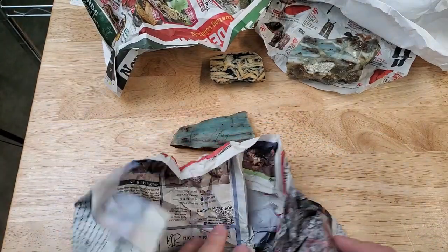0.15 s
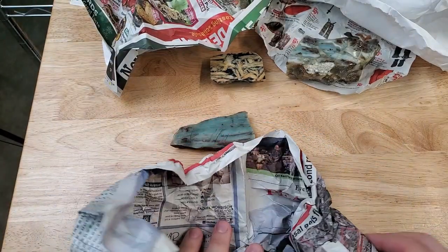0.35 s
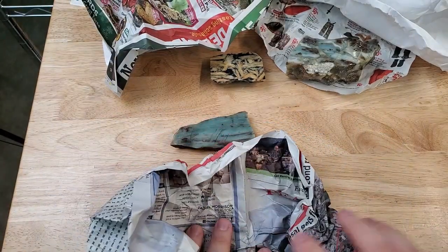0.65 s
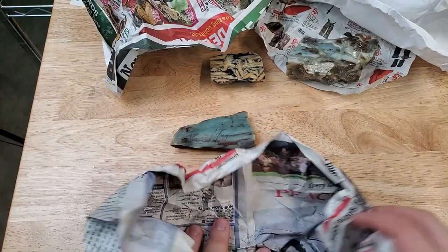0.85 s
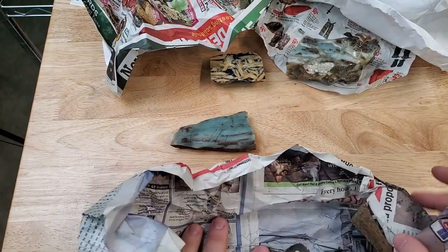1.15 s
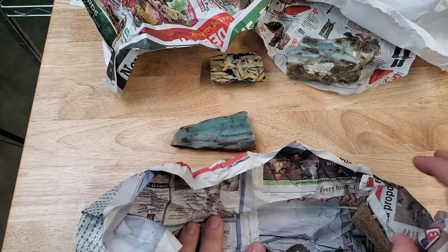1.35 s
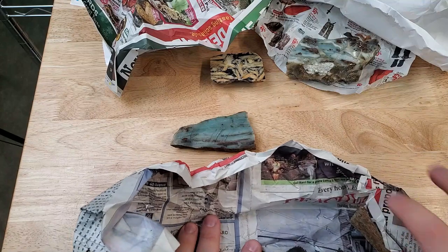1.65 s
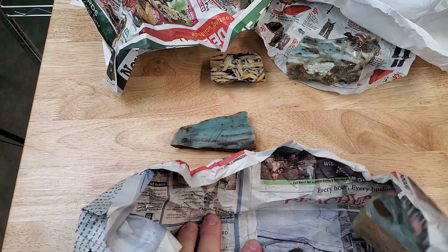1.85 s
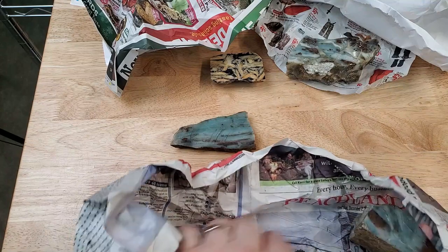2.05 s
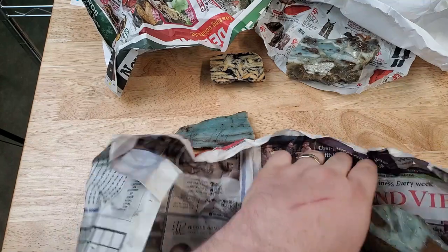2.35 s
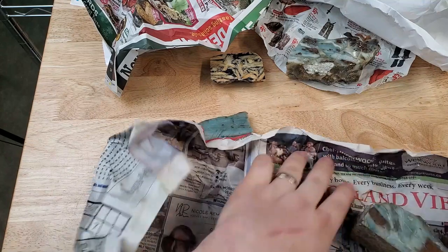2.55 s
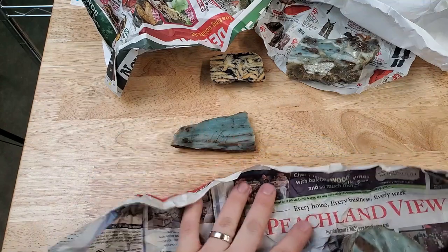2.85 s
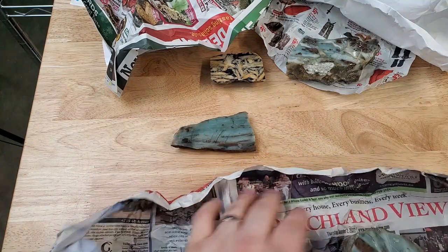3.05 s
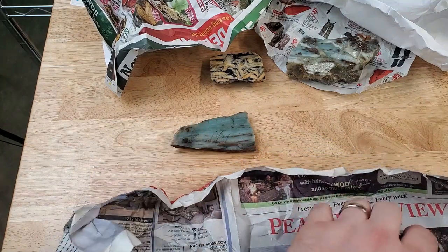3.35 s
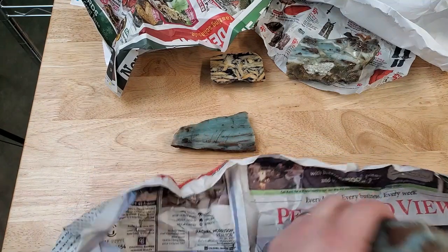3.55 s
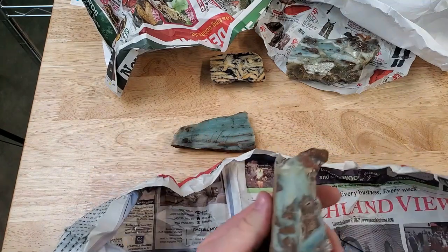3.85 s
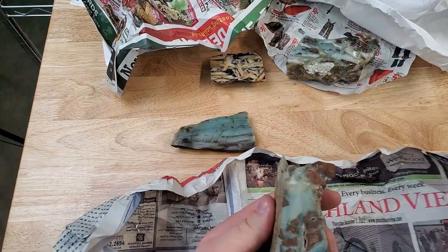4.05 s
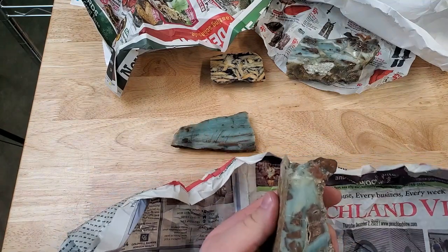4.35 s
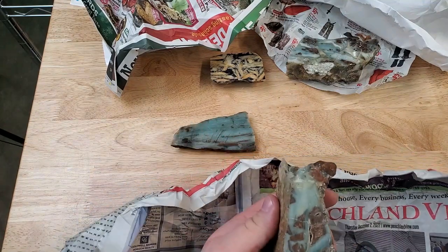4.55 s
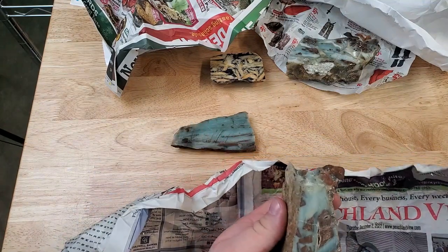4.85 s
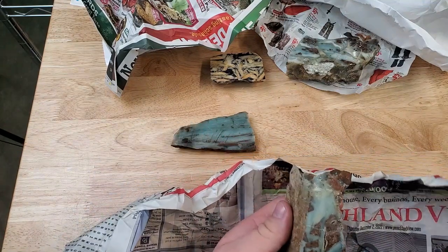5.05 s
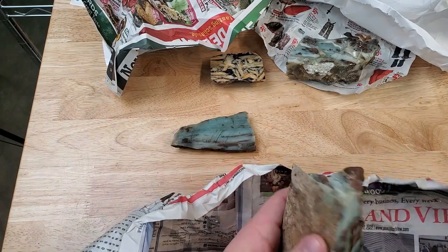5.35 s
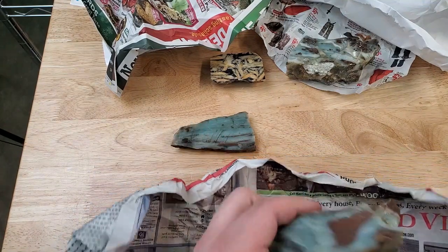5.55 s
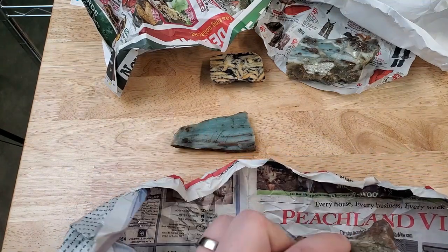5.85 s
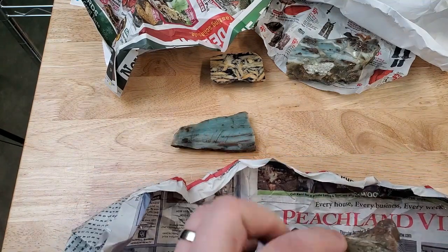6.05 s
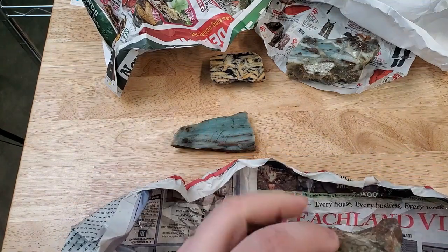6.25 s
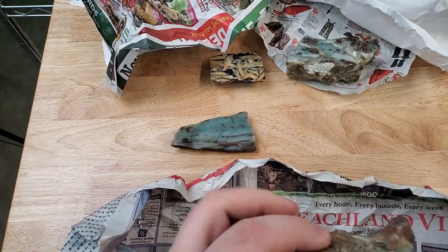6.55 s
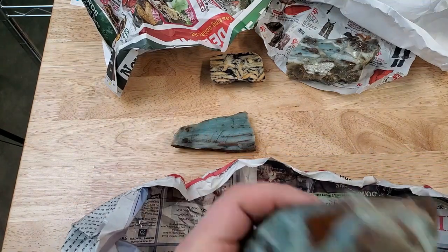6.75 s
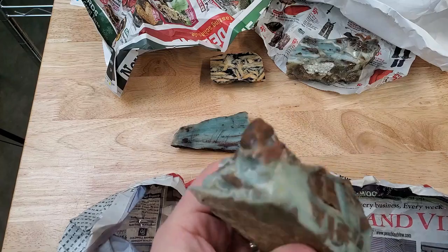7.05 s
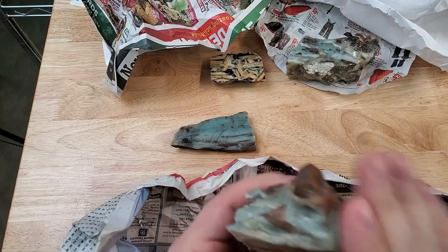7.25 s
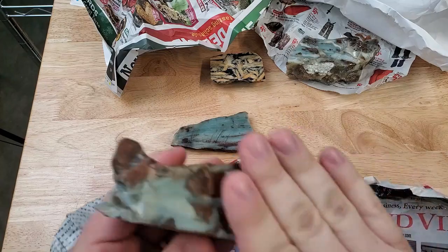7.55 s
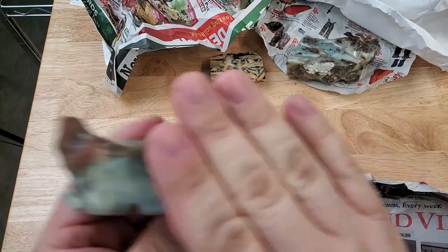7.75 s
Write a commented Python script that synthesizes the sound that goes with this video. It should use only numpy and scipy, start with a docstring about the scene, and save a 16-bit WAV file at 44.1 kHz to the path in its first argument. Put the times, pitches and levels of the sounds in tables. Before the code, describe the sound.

Close, crisp paper crumpling with a few dull table thumps, fading into dry rubbing strokes on stone and faint clacks on wood.

```python
"""Newspaper crumpled round a stone on a wooden table

Hands crumple and flatten newspaper: a crackle of tiny clicks over a smooth slide, with sharp snaps from single creases.
The wrapped stone knocks and drags on the table, a bank of ringing modes, and the sheet slips with a thin squeak.
Fingers brush grit off the stone in firm strokes and light returns of coloured grains and hiss.
Last, the bare stone is rocked on the wood: knocks, ringing clacks and crunch. Two close microphones, in a quiet room."""
import sys
import numpy as np
from scipy import signal
from scipy.io import wavfile
from scipy.ndimage import uniform_filter1d

SR = 44100
rng = np.random.default_rng(int(sys.argv[2]) if len(sys.argv) > 2 else 0)


def store_wav(level_fs):
    """Save 16-bit WAV to argv[1]."""
    pcm = np.round(np.clip(np.atleast_2d(level_fs), -1, 1) * 32767)
    wavfile.write(sys.argv[1], SR, pcm.T.astype(np.int16))


N = 348390
BARE_S = 6.8  # from here the stone is on the wood without paper

# Single creases buckling: t/s, nominal peak/dB, pitch f/Hz, treble rms over peak/dB, decay/ms
SNAPS = [(0.0506, -16, 2390, -34, 2.2), (0.1109, -10.5, 3720, -26, 1.7), (0.1335, -20.5, 2860, -31, 3.7),
         (0.143, -30, 2580, -26, 2.2), (0.18, -15, 2000, -31, 2.3), (0.209, -13.5, 2480, -36, 0.86),
         (0.2626, -16, 2970, -17, 1.2), (0.3116, -12.5, 2200, -46, 2.7), (0.282, -29, 4000, -25, 1.5),
         (0.359, -21, 5200, -30, 1.5), (0.377, -17.5, 5870, -31, 0.82), (0.418, -6.5, 1390, -25, 0.3),
         (0.505, -23, 2760, -20, 1.7), (0.54, -24, 3520, -26, 0.85), (0.5716, -23, 1730, -33, 1.4),
         (0.6324, -28, 3000, -30, 1.1), (0.7975, -19.5, 2000, -22, 2.4), (0.865, -19.5, 1780, -31, 1.5),
         (0.957, -11.5, 3180, -40, 1.1), (0.9785, -11.5, 2000, -37, 0.49), (1.0136, -13, 1960, -29, 1),
         (1.028, -13.5, 4250, -18, 2), (1.05, -16.5, 5830, -19, 2.7), (1.1132, -3, 4070, -20, 0.55),
         (1.14, -32, 4000, -18, 1.2), (1.1427, -10, 1420, -17, 1.3), (1.2087, -24, 1970, -22, 1.4),
         (1.2188, -20, 3040, -23, 1), (1.2514, -21, 1700, -23, 2.7), (1.28, -16, 3050, -21, 4.5),
         (1.2835, -8, 2180, -25, 1.2), (1.291, -19.5, 1950, -32, 5.7), (1.296, -7, 2010, -17, 0.8),
         (1.3071, -13.5, 2620, -33, 1.6), (1.364, -19, 2000, -21, 2.7), (1.369, -8.5, 5800, -15.5, 1.2),
         (1.374, -25, 1980, -16, 2), (1.381, -34, 4500, -10, 0.95), (1.392, -35, 2000, -25, 1.3),
         (1.3994, -10.5, 4200, -19, 0.53), (1.437, -23.5, 2570, -27, 1.2), (1.472, -22, 1900, -34, 1.4),
         (1.4849, -26.5, 2130, -33, 3), (1.5243, -18.5, 1460, -32, 1.4), (1.5886, -17.5, 3100, -17, 0.72),
         (1.6208, -25.5, 890, -33, 2.1), (1.6742, -15, 1470, -23, 2.7), (1.6976, -22, 1480, -22, 3),
         (1.7511, -9.5, 1110, -28, 1.26), (1.7816, -18.5, 830, -34, 1.4), (1.8645, -11, 1520, -18, 2.3),
         (1.873, -22, 2450, -21, 2), (1.8842, -36, 7000, -29, 1.2), (1.9075, -42, 3280, -13, 1.4),
         (2.1926, -30, 1450, -36, 2.2), (2.216, -33, 4000, -16, 1.1), (2.227, -27.5, 1400, -15, 1),
         (2.249, -32, 1220, -25, 1.2), (2.275, -36, 3830, -25, 1.8), (2.293, -21.5, 3580, -16, 1.4),
         (2.3262, -23, 3370, -41, 3.4), (2.37, -19, 2230, -50, 1.9), (2.471, -22.5, 3730, -13, 1.3),
         (2.48, -19, 3800, -13, 0.88), (2.5289, -15.5, 4450, -17, 2.4), (2.546, -40, 4000, -16, 1),
         (2.6652, -9.5, 2930, -27, 0.5), (2.712, -12, 1420, -21, 1.46), (2.7682, -7, 4940, -17.5, 1.35),
         (2.793, -24, 2150, -11, 1.3), (2.823, -16, 2600, -29, 1.3), (2.829, -20, 3600, -25, 1.5),
         (2.8724, -13.5, 5600, -30, 2.3), (2.878, -17, 3900, -13, 1.2), (2.921, -12, 3440, -17, 0.56),
         (3.0115, -23.5, 5430, -16.5, 2.9), (3.0735, -23, 1800, -32, 1), (3.088, -17, 3960, -17, 1),
         (3.103, -28, 4500, -11, 1), (3.1187, -22, 3520, -11, 1.8), (3.216, -36.5, 3670, -26, 4.9),
         (3.267, -25.5, 4230, -15, 3.2), (3.276, -34, 4000, -20, 1), (3.295, -31, 4190, -25, 2.1),
         (3.3387, -32, 3600, -6, 1.5), (3.3945, -18.5, 4150, -16.5, 1.3), (3.4723, -18, 3500, -28, 1.8),
         (3.519, -22, 3520, -23, 1.6), (3.5268, -9.5, 3900, -25, 1.2), (3.5543, -48, 3700, -25, 1.2),
         (3.7244, -26.5, 2800, -19, 3), (3.8114, -24, 3700, -32, 0.56), (3.8735, -24.5, 6800, -23, 1.5),
         (3.9753, -26.5, 2000, -33, 2.5), (4.0976, -30.5, 4060, -28, 2.4), (4.122, -29, 3030, -25, 1.1),
         (4.1683, -31, 3280, -36, 1.8), (4.1946, -28, 1180, -26, 1.2), (4.231, -31, 3630, -19, 1.2),
         (4.261, -35, 1200, -35, 2.4), (4.2918, -32.5, 2730, -35, 2.3), (4.3672, -29.5, 1980, -39, 3),
         (4.419, -26, 1090, -30, 0.61), (4.7188, -15.5, 4760, -17.5, 1.16), (4.8734, -39.5, 2100, -24, 1.8),
         (5.654, -36, 3440, -26, 1.1), (5.682, -39, 1210, -32, 0.99), (5.689, -44, 1230, -28, 2.9),
         (6.5228, -42.5, 4860, -28, 3.7), (6.567, -46.5, 1490, -29, 2.6), (6.594, -64, 1500, -25, 1.8),
         (6.63, -57, 3500, -24, 2), (6.647, -49, 1300, -30, 2.8), (6.684, -44.5, 5450, -22, 1.5),
         (6.7, -51, 4500, -22, 2.3)]
# Blows on the table: t/s, relative strength/dB, deep modes over upper/dB, middle modes over upper/dB,
# contact/ms, relative stone clack over strength/dB
KNOCKS = [(0.419, -15, -17, -5, 1.1, -40), (0.428, -25, -25, 0.5, 3.5, -26),
          (0.796, -30.5, -23, -32, 0.68, -31), (0.872, -32, -10, -1, 3., -35),
          (0.921, -20, -8, -1.5, 2.6, -16), (0.937, -29, -11, 6, 6.9, -34), (1.12, -15.5, 7, 1.5, 2.3, -32),
          (1.747, -45.5, -23, 0.5, 3.6, -32), (1.859, -22, -12, -6.5, 0.53, -20),
          (2.067, -42, -14, 4, 2.8, -37), (2.088, -41.5, -18, 1.5, 3.6, -27),
          (2.606, -38.5, -12, -13, 1.2, -30), (2.873, -35, -10, -1.5, 1.8, -30),
          (2.91, -49, -13, 12, 4.1, -30), (3.522, -35.5, -31, -7.5, 2.2, -37),
          (6.834, -28, 12, -26, 2.1, 2), (6.842, -36, 5, -8, 1.8, -4), (6.864, -30.5, -4, -21, 1.4, 2.5),
          (6.886, -37.5, 4, -22, 3.1, 5.5), (6.907, -42, 10, 10, 4.5, -8), (7.007, -35, 4, -9, 0.81, -6),
          (7.027, -40, -8, 9, 0.79, -16), (7.051, -39, -1, -15, 2.2, -10), (7.069, -51, 3, -12, 1.8, 2),
          (7.182, -41, 23, 5.5, 1.5, -6.5), (7.315, -39.5, -8, 1, 1.1, -10.5),
          (7.344, -49, 10, 5, 0.84, -23), (7.473, -43, 15, -9, 0.77, -11), (7.49, -60, 5, -8, 2.1, -18),
          (7.506, -47.5, 5, -12, 0.76, -16), (7.531, -51, 2, -4, 0.99, -14), (7.599, -49, 7, -8, 1.3, -6),
          (7.624, -62, 29, -8, 3.4, -20), (7.716, -47, 28, -23, 0.95, -26),
          (7.822, -44.5, 27, -18, 1, -14.5)]


def rustle():
    """Countless small creases click while the sheets slide; each snap leaves a short trail of crackle."""
    # How hard the paper is worked: t/s, crackle level/dB before the fullness below
    effort = [(0, -41.5), (.08, -33.5), (.3, -37.5), (.47, -46), (.77, -43), (.83, -33), (.89, -39),
              (1.01, -32.5), (1.13, -38), (1.25, -47.5), (1.39, -38), (1.44, -52), (1.65, -43.5),
              (1.82, -39.5), (1.88, -32.5), (2.0, -40), (2.08, -53.5), (2.2, -59.5), (2.225, -49),
              (2.26, -46.5), (2.33, -41), (2.6, -41.5), (2.85, -32), (3.04, -41), (3.12, -49),
              (3.16, -60.5), (3.44, -56.5), (3.54, -41.5), (3.6, -49), (3.71, -44), (3.8, -59),
              (3.89, -50.5), (3.98, -53), (4.06, -62), (4.3, -64), (4.4, -51.5), (4.49, -55), (4.57, -46.5),
              (4.63, -64), (4.78, -60), (4.85, -78), (4.9, -61), (5.75, -89), (6.47, -71), (6.6, -96),
              (6.635, -82), (6.73, -87), (6.82, -64)]
    # Colour of the paper crackle: f/Hz, filter gain/dB
    paper = [(240, -16.5), (400, -11.5), (606, -10), (707, -13.5), (877, -9.5), (3780, -5.5), (6990, -15.5),
             (8150, -24.5), (15100, -26), (15800, -27)]
    # Body as other folds are worked: t/s, gain of the part under 2.5 kHz/dB
    fullness = [(0, 2.5), (.3, 5.5), (.6, 2), (1., 3.5), (1.4, 3.5), (1.8, 0.5), (2.1, 0), (2.45, 3.5),
                (2.9, -1.5), (3.3, -1), (3.6, -1.5), (3.95, 6.5), (4.3, 9.5), (4.55, -4), (6.6, -8)]
    settle_db, settle_db_per_s = -29, 420  # trail under the snap's peak, and its fall
    treble_db, treble_follows = -43.5, 1  # treble at the usual crackle level, dB per dB of crackle

    clicks = grains(per_s=700, spread_db=5.0, clump_db=3.5, clump_ms=8.6, smooth_db=6.5, ms=0.8, cycles=2.2)
    crackle = colour(patchy(clicks), paper)
    s, peak_db = np.transpose(SNAPS)[:2]
    trail = dying(s, peak_db + settle_db, settle_db_per_s)
    db = decibels(amp(level(effort)) + trail)
    balanced = tilted(crackle, 7300, db, following(db, treble_db, treble_follows))
    low, high = split(balanced, 2500)
    return amp(level(fullness)) * low + high


def snaps(rows):
    """A sudden release: a burst of a few milliseconds, ringing its surroundings for a cycle or two."""
    rise_ms, ring_cycles = 0.35, 1.5
    broad_db = -0.5  # unpitched part, ahead of the 0.5 share of the ring
    crest_db = 13.5  # peak of a burst over its rms
    pan_db, pan_db_per_s, pan_scatter_db = 3.5, -1.48, 4  # events wander from left to right

    out, t = np.zeros((2, N + 800)), np.arange(700) / SR
    chance = rng.standard_normal((len(rows), 4, len(t)))
    for (s, db, hz, treble_db, ms), (a, b, c, d) in zip(rows, chance):
        pan = pan_db + pan_db_per_s * s + pan_scatter_db * d[1]
        burst = np.exp(-t * 1000 / max(ms, .3)) * (1 - np.exp(-t * 1000 / rise_ms))
        ring = np.sin(2 * np.pi * hz * t) * np.exp(-t * hz / ring_cycles)
        pitched = split(np.convolve(a * burst, ring)[:len(t)], 600)[1]
        pitched *= np.linalg.norm(burst) / np.linalg.norm(pitched)
        broad = split(split(b, 7500)[0], hz / 3 + 300)[1] * burst
        body = .5 * pitched + amp(broad_db) * broad
        body *= np.linalg.norm(burst, 4) / np.linalg.norm(body, 4)  # fourth powers favour the peaks
        treble = amp(treble_db + crest_db) * split(c, 7500)[1] * burst
        at = round(s * SR)
        lag = 5 - 2 * np.clip(pan, -4, 4)  # further left: the left side hears it sooner
        out[:, at:at + len(t)] += amp(db) * place(body + treble, pan, lag)
    return out[:, :N]


def table():
    """Blows and dragging weight drive one plate; each blow sets the share of each family of modes."""
    # Table top: f/Hz, relative level/dB, t60/s
    plate = [(74.4, -8.5, 0.25), (100.3, -6.5, 0.077), (125, -13.5, 0.083), (171, -9, 0.053),
             (215.2, 3.5, 0.19), (255.7, 3, 0.13), (307, 0.5, 0.12), (343.4, -3, 0.15), (371, 1, 0.037),
             (431.7, -10.5, 0.16), (485.4, -9, 0.14), (550, -16.5, 0.28), (632, -39, 0.1), (671, -11, 0.15),
             (722, -19.5, 0.18), (742, -14.5, 0.075), (860, -27.5, 0.34), (966, -35, 0.14),
             (1160, -21, 0.06)]
    # Ring of the stone: f/Hz, relative level/dB, t60/s
    stone = [(1550, -24, .02), (1870, -19, 0.03), (2480, -21, 0.017), (2645, -17, .03), (2725, -12, 0.04),
             (2820, -18, .03), (3050, -21, 0.019), (3380, -19, .022), (3560, -22, .02), (3880, -17, 0.018),
             (4300, -10, 0.025), (4860, -24, .015), (5550, -28, 0.02)]
    # The wrapped weight dragging over the table top: t/s, level/dB
    dragging = [(0.0, -58), (0.34, -52), (0.57, -59), (0.82, -56), (1.08, -48), (1.24, -44), (1.51, -53),
                (1.96, -52), (2.13, -59.5), (2.32, -57.5), (2.88, -46), (3.08, -51), (3.25, -55.5),
                (4.26, -61), (4.57, -68.5), (4.9, -103)]
    # The bundle comes to rest and stills the table top: t/s
    settled = [0.499, 1.178]
    stilled, still_db_per_s = 0.94, 62  # gain taken from the free 1.5, and how fast the hold eases
    deep_hz, upper_hz = 190, 300  # borders of the mode families
    chip_ms, scratch_db = 2.6, 5  # decay of the rough contact; its gain ahead of band filters
    ring_follows = 0.11  # light blows ring the stone less: extra dB per dB of clack
    drag_deep_db, press_wood_db, press_deep_db = 2, 3.5, -0.5  # drag; hand pressure through the arm
    grind_deep_db, grind_wood_db, grind_stone_db = 6, 0, -11  # deep modes, other modes, stone over the crunch
    chatter_db, chatter_db_per_s = -17.5, 247  # the wrapped stone chatters on: over the blow, and its fall
    bare_hz, bare_db = 293, 0.5  # upper wood gain once the stone is bare

    deep = [m for m in plate if m[0] < deep_hz]
    middle = [m for m in plate if deep_hz < m[0] < upper_hz]
    upper = [m for m in plate if m[0] > upper_hz]

    push, (hard, ringing) = np.zeros((3, N + 800)), np.zeros((2, N + 800))
    n = np.arange(300)
    chip_shape = np.exp(-n / SR * 1000 / chip_ms) * np.minimum(n / 40, 1)
    chips = rng.standard_normal((len(KNOCKS), 300)) * chip_shape  # every clack differs
    tap = signal.windows.hann(300) * np.exp(-n / 6) * 200
    for (s, db, deep_db, middle_db, ms, clack_db), chip in zip(KNOCKS, chips):
        blow = np.gradient(signal.windows.hann(round(ms * SR / 1000) + 2))  # pressed in, then released
        at = round(s * SR)
        push[:, at:at + len(blow)] -= amp(db - 8) * amp([[deep_db], [middle_db], [0]]) * blow
        hard[at:at + len(chip)] += amp(db - 12 + clack_db) * chip
        ring_db = following(db + clack_db, -25, 1 + ring_follows)
        ringing[at:at + len(chip)] += amp(ring_db) * (chip / 5 + tap)

    swell = amp(1.8 * evened(uniform_filter1d(rng.standard_normal(N), 900)))
    bumps = np.gradient(rng.standard_normal(N)) * swell
    press = strokes()[-1]
    load = amp(level(dragging)) + amp(press_wood_db) * press
    deep_load = amp(level(dragging) + drag_deep_db) + amp(press_deep_db) * press
    deep_load += amp(rocking() + grind_deep_db)
    drag = load * evened(modes(middle + upper, bumps)) + deep_load * evened(modes(deep, bumps))

    s, db = np.transpose([k[:2] for k in KNOCKS if k[0] < BARE_S])
    chatter = dying(s, db + chatter_db, chatter_db_per_s) * evened(modes(upper, bumps))
    hold = uniform_filter1d(np.minimum(dying(settled, 0, still_db_per_s), 1), 400)
    free = 1.5 - stilled * hold
    blows = sum(map(modes, [deep, middle, upper], push))
    rocked = amp(rocking() + grind_wood_db) * evened(modes(middle + upper, np.cumsum(bumps)))
    wood = free * (blows + chatter) + drag + rocked
    bare = wood * (np.arange(N) > BARE_S * SR)
    wood += (amp(bare_db) - 1) * split(bare, bare_hz)[1]

    scratch = split(split(hard[:N], 3200)[0], 1300)[1]
    clack = modes(stone, ringing) + amp(scratch_db) * scratch
    clack += amp(rocking() + grind_stone_db) * evened(modes(stone, bumps))
    return place(wood, -0.27, 5.3) + place(clack, -3.1, 15)


def brush():
    """Skin slides over gritty rock: dense hiss of grains, and a dull rub in the hand."""
    # Colour of the grit: f/Hz, filter gain/dB
    grit = [(290, -27), (500, -7), (800, -3.5), (1300, -4.5), (1800, 0), (2300, -3.5), (4400, 0),
            (5010, -2.5), (7370, -6.5), (8390, -8), (15300, -6.5)]
    # Hollow of the hand holding the stone: f/Hz, relative level/dB, t60/s
    palm = [(286, 16, 0.4), (387, 12, 0.034), (485, 5, 0.088), (556, -28, 0.0078)]
    # Faint high hiss while the stone is turned in the hands: t/s, level/dB
    turning = [(7.3, -93), (7.378, -60), (7.444, -60), (7.466, -80), (7.494, -64), (7.618, -51),
               (7.676, -66), (7.718, -55.5), (7.764, -53), (7.83, -77), (7.856, -55), (7.9, -46)]
    late_body_db = -12.5  # lower part of that hiss under its high part

    slide = grains(per_s=1600, spread_db=4.0, ms=0.21, cycles=0.8, smooth_db=4.0, clump_db=3.5, clump_ms=6.)
    hiss = colour(slide, grit)
    rub = place(evened(modes(palm, hiss[0])), 0.1, 9.8)
    high, body, press = strokes()
    graze = amp(level([(BARE_S, -200)] + turning))
    low_db = decibels(body + amp(late_body_db) * graze)
    return tilted(hiss, 5280, low_db, decibels(high + graze)) + press * rub


def strokes():
    """Gains of hiss, body and pressure: each stroke lands fast and fades; its pressure is one late hump."""
    # Firm strokes and light returns: start t/s, hiss level/dB, length/s, pressure on the stone/dB
    fingers = [(4.921, -32, 0.3, -50), (5.103, -52, 0.068, -56.5), (5.222, -29, 0.16, -44.5),
               (5.338, -40, 0.15, -61.5), (5.485, -54.5, 0.2, -55.5), (5.792, -33.5, 0.01, -75),
               (5.815, -24.5, .1, -67), (5.925, -45, 0.16, -63), (6.027, -26.5, 0.14, -48.5),
               (6.152, -44, 0.096, -59.5), (6.236, -29.5, 0.18, -49.5), (6.371, -45.5, 0.12, -53)]
    land_db_per_s, lift_db = 982, -49.5  # swell up to the start; fade after one length
    lift_shape = 2.15  # higher: the stroke holds, then stops more suddenly
    body_db, body_follows = -44.5, 0.47  # body at the usual hiss level, dB per dB of hiss
    press_late, press_s = 0.29, 0.041  # hump centre as a share of the length; its width

    s, db, length, press_db = np.transpose(fingers)[:, :, None]
    t = np.arange(N) / SR - s
    land_db = land_db_per_s * np.minimum(t, 0)
    sliding_db = db + lift_db * (np.maximum(t, 0) / length) ** lift_shape
    hiss = amp(land_db + sliding_db).sum(0)
    body = amp(land_db + following(sliding_db, body_db, body_follows)).sum(0)
    hump = np.exp(-((t - press_late * length) / press_s) ** 2)
    return hiss, body, (amp(press_db) * hump).sum(0)


def grind():
    """Rough rock crunches on the wood after each bare blow and while it scuffs."""
    # Colour of the crunch: f/Hz, filter gain/dB
    tone = [(180, -18.5), (300, -8.5), (772, -10.5), (1230, -18), (2390, -19), (2720, -20), (5740, 0.5),
            (15800, 14)]
    treble_db, treble_follows = -60, 0.32  # treble at the usual crunch level, dB per dB of crunch
    rough = grains(per_s=1400, spread_db=-3.5, clump_db=5.5, clump_ms=4.1, ms=2.3, cycles=1.7, smooth_db=4.)
    return tilted(colour(rough, tone), 3200, rocking(), following(rocking(), treble_db, treble_follows))


def rocking():
    """Crunch level in dB: each blow of the bare stone adds a dying burst, and scuffing sustains it."""
    # The bare stone scuffing along the wood between blows: t/s, level/dB
    scuff = [(6.8, -120), (7.01, -66), (7.035, -53), (7.08, -54), (7.13, -84), (7.46, -83), (7.51, -57),
             (7.56, -69), (7.6, -49), (7.66, -80)]
    grind_db, grind_db_per_s = -6, 217  # crunch over the blow that starts it, and its fall
    s, db = np.transpose([k[:2] for k in KNOCKS if k[0] > BARE_S])
    return decibels(dying(s, db + grind_db, grind_db_per_s) + amp(level(scuff)))


def squeak():
    """A narrow fuzzy tone follows the slip of the sheet after a thud."""
    # One list per slip: t/s, pitch f/Hz, level/dB
    slips = [
        [(2.062, 700, -73), (2.074, 1310, -45), (2.08, 2220, -42), (2.088, 2670, -66)],
        [(2.088, 1610, -52), (2.105, 1635, -47), (2.13, 1710, -53), (2.15, 1560, -63)],
    ]
    blur_hz = 120  # bandwidth of the fuzz
    out, t = np.zeros(N), np.arange(N) / SR
    for rows in slips:
        s, hz, db = np.transpose(rows)
        r = np.exp(-np.pi * blur_hz / SR)
        blur = evened(signal.lfilter([1], [1, -r], rng.standard_normal(N)))
        turn = 2 * np.pi * np.cumsum(np.interp(t, s, hz)) / SR
        gain = amp(np.interp(t, s, db, left=-200, right=-200))
        out += gain * (.4 * np.sin(turn) + blur * np.cos(turn))
    return place(out, 0, 4.3)


def room(x):
    """Dense echoes, each band dying at its own speed."""
    # Decay of the room: f/Hz, t60/s
    decay = [(200, .14), (1000, .13), (4000, .15), (12000, .11)]
    hz, t, z = signal.stft(rng.standard_normal((2, SR // 2)), SR, nperseg=128)
    tail = signal.istft(z * amp(-60 * t / read(decay, hz)[:, None]), SR, nperseg=128)[1]
    onset = np.minimum(np.arange(tail.shape[1]) / 300, 1)
    low, high = split(tail * onset, 340)
    tail = high + 0.6 * low.mean(0) + 0.4 * low  # long waves reach both microphones more alike
    return signal.oaconvolve(x, tail / np.linalg.norm(tail[0]), axes=1)[:, :N]


def air():
    """Steady hush of the room: coloured noise with its bass common to both sides."""
    # Quiet room: f/Hz, filter gain/dB
    hush = [(18, -1), (30, 16.5), (86, -4), (294, -16.5), (523, -8), (662, -18), (1340, -17), (2460, -19),
            (3740, -21.5), (7990, -33), (15800, -32)]
    noise = rng.standard_normal((3, N))
    shared, separate = split(noise[:1], 680)[0], split(noise[1:], 350)[1]
    return amp(-56.5) * evened(colour(shared + separate, hush))


def grains(per_s, spread_db, clump_db, clump_ms, ms, cycles, smooth_db, count=14, order=3):
    """Small releases in clumps, each spot with its own pitch and bearing, over a smooth slide."""
    drift = evened(uniform_filter1d(rng.standard_normal(N), round(clump_ms * SR / 1000)))
    clumps = amp(clump_db * drift)
    size = amp(spread_db * np.minimum(rng.exponential(1, N), order))  # order caps the spread
    size = size * (rng.random(N) < per_s / SR * clumps)
    spot, t, out = rng.integers(0, count, N), np.arange(400) / SR, np.zeros((2, N))
    for k, hz in enumerate(np.geomspace(800, 13000, count)):
        burst = rng.standard_normal(len(t)) * np.exp(-t * 1000 / ms)
        ring = np.sin(2 * np.pi * hz * t) * np.exp(-t * hz / cycles)
        grain = 0.43 * burst / np.linalg.norm(burst) + np.sqrt(hz / 4000) * ring / np.linalg.norm(ring)
        clicks = signal.oaconvolve(size * (spot == k), grain)[:N]
        out += place(clicks, 1.4 * rng.standard_normal(), rng.integers(-4, 14))
    slide = rng.standard_normal((2, N)) * np.sqrt(clumps)
    crossed = slide + 0.11 * np.roll(slide[::-1], 6, axis=1)  # each side leaks late into the other
    return evened(out) + amp(smooth_db) * evened(crossed)


def patchy(x):
    """Random bright and dull spots drift over time and pitch, as each fold colours the crackle."""
    patch_db, patch_hz, patch_ms = 2.5, 1200, 15
    z = signal.stft(x, nperseg=256, noverlap=192)[2]
    spots = rng.standard_normal(z.shape[:0:-1]).T
    spots = uniform_filter1d(spots, max(round(patch_hz * 256 / SR), 1), axis=0)
    spots = evened(uniform_filter1d(spots, max(round(patch_ms / 1000 * SR / 64), 1), axis=1))
    return evened(signal.istft(z * amp(patch_db * spots), nperseg=256, noverlap=192)[1][:, :N])


def modes(bank, drive):
    """Each mode rings from the drive; neighbours start in opposite directions."""
    t = np.arange(SR // 2) / SR
    ring = np.zeros(len(t))
    for k, (hz, db, t60) in enumerate(bank):
        ring += (-1) ** k * amp(db - 60 * t / t60) * np.sin(2 * np.pi * hz * t)
    return signal.oaconvolve(drive, ring)[:N]


def colour(x, points):
    """Causal minimum-phase filter with the given gain curve."""
    hz = abs(np.fft.fftfreq(4096, 1 / SR))
    log_gain = np.log(amp(np.maximum(read(points, hz), -80)))
    taps = np.fft.ifft(np.exp(np.conj(signal.hilbert(log_gain)))).real[:2048]
    return signal.oaconvolve(x, taps[None], axes=1)[:, :N]


def split(x, hz):
    """Parts below and above hz, which add up to x."""
    low = signal.sosfiltfilt(signal.butter(3, hz, fs=SR, output="sos"), x)
    return low, x - low


def tilted(x, hz, low_db, high_db):
    """Sets the level on each side of hz."""
    low, high = split(x, hz)
    return amp(low_db) * evened(low) + amp(high_db) * evened(high)


def place(x, pan_db, lag):
    """Left over right by pan_db; the left microphone hears the sound lag samples late."""
    sides = np.array([np.roll(x, int(lag)), x])
    return sides * amp([pan_db / 2, -pan_db / 2]).reshape(2, -1)


def dying(s, db, db_per_s):
    """Gain that jumps up at each event and falls steadily in dB."""
    kicks = np.zeros(N)
    kicks[np.round(np.multiply(s, SR)).astype(int)] = amp(db)
    return signal.lfilter([1], [1, -amp(-db_per_s / SR)], kicks)


def following(db, usual_db, share):
    """Moves from usual_db by a share of another level's swing about -40 dB; stops when that is silent."""
    return np.where(db > -100, usual_db + share * (db + 40), -200)


def level(rows):
    """A level curve at every sample, silent after its end."""
    return np.interp(np.arange(N) / SR, *np.transpose(rows), right=-200)


def read(points, hz):
    """Reads a curve on a logarithmic frequency axis."""
    f, value = np.transpose(points)
    return np.interp(np.log(hz + 1), np.log(f + 1), value)


def evened(x):
    """Scales to an rms of one."""
    return x / np.sqrt(np.mean(x ** 2) + 1e-20)


def amp(db):
    """Decibels to gain."""
    return 10 ** (np.asarray(db) / 20)


def decibels(gain):
    """Gain to decibels, with a floor at -120 dB."""
    return 20 * np.log10(gain + 1e-6)


def scene():
    """Paper, stone and hands over the table, with their echoes and the hush of the room."""
    # Grains of grit catching under the fingers: t/s, nominal peak/dB, pitch f/Hz,
    # treble rms over peak/dB, decay/ms
    catches = [(5.0718, -23.5, 900, -26, 0.77), (5.107, -20, 5000, -20, 0.89),
               (5.221, -27.5, 6000, 1.5, 1.1), (5.515, -40, 5000, -9, 1.2), (5.9317, -30, 3900, -29, 3.2),
               (6.074, -28, 7000, 4, 1), (6.093, -33, 7000, 5, 1), (6.241, -27.5, 7000, 7, 1.1),
               (6.259, -17.5, 6000, -6, 1.2), (6.2877, -20.5, 7500, -8.5, 2.2),
               (6.3084, -26.5, 3650, -1, 2.5), (6.338, -19.5, 5030, -17, 1.2), (6.395, -25, 1180, -37, 3.7),
               (6.427, -44, 6500, -22, 1.1), (6.449, -34, 5830, -29, 0.71)]
    paper = rustle() + snaps(SNAPS) + squeak()
    stone = snaps(catches) + brush() + grind()
    near, wood = paper + stone, table()
    echoes = room(amp(-8.5) * near + amp(-14) * wood)
    return near + wood + echoes + air()


def record(dry):
    """The microphones drop the deepest bass; then the band limit."""
    thin = signal.sosfilt(signal.butter(3, 60, "high", fs=SR, output="sos"), dry)
    band_limit = signal.firwin(511, 15850, window=("kaiser", 7), fs=SR)
    return signal.oaconvolve(thin, band_limit[None], "same")


dry = scene()
out = record(dry)
store_wav(out)
```